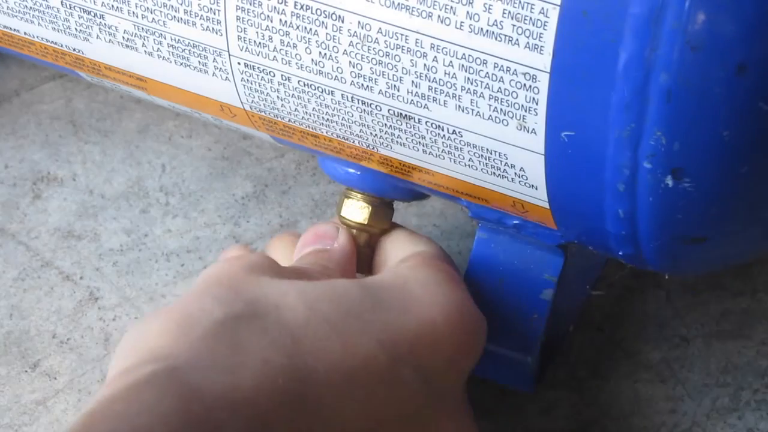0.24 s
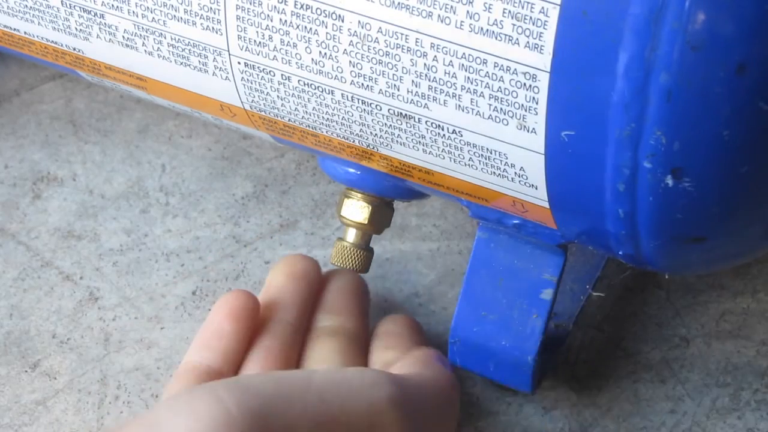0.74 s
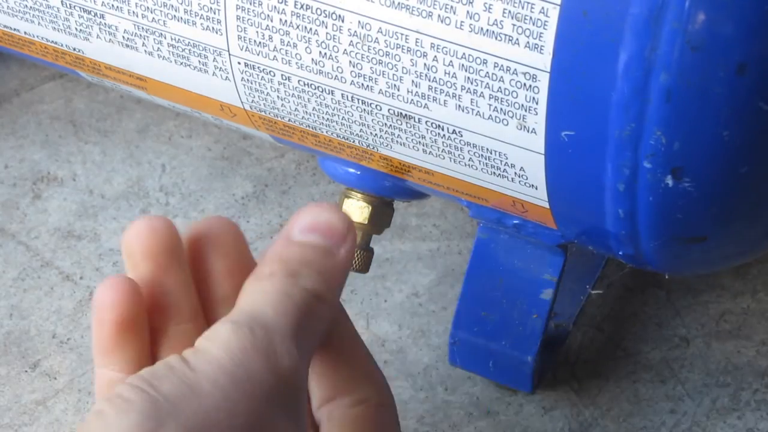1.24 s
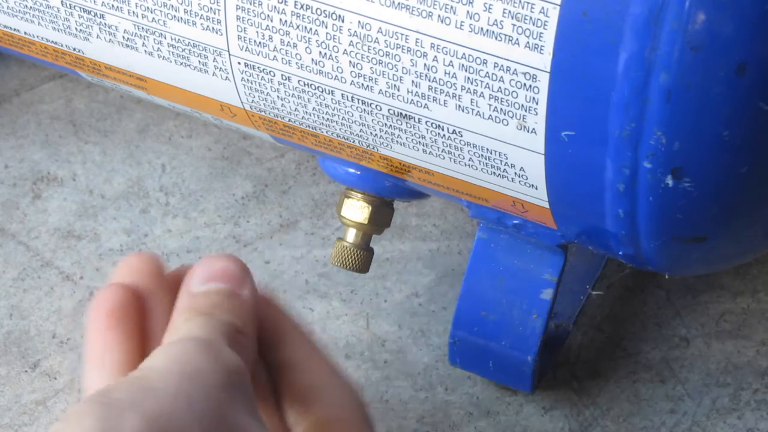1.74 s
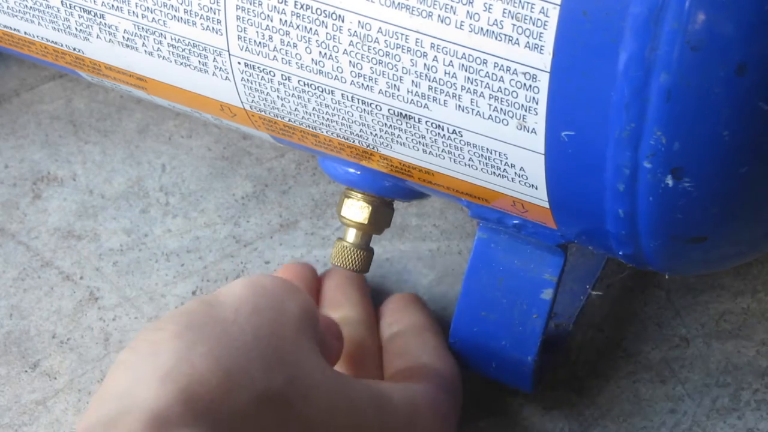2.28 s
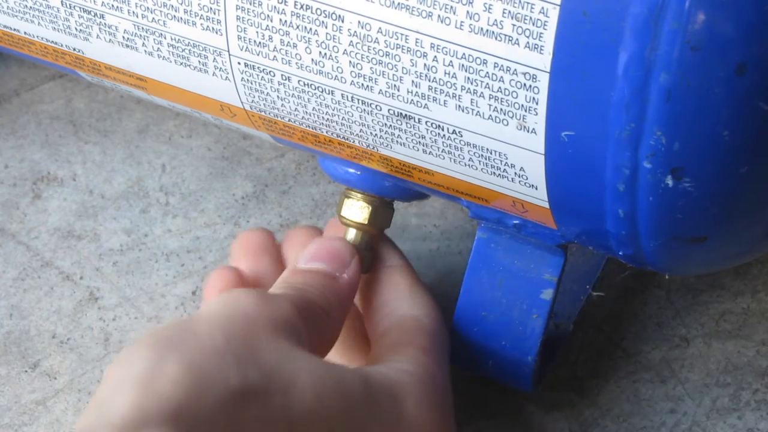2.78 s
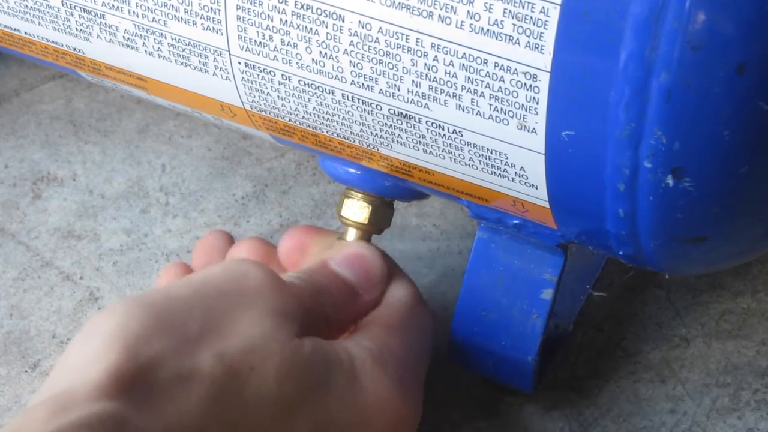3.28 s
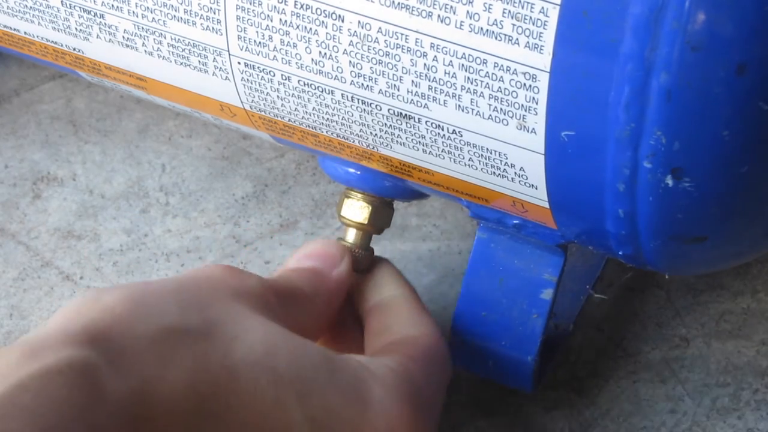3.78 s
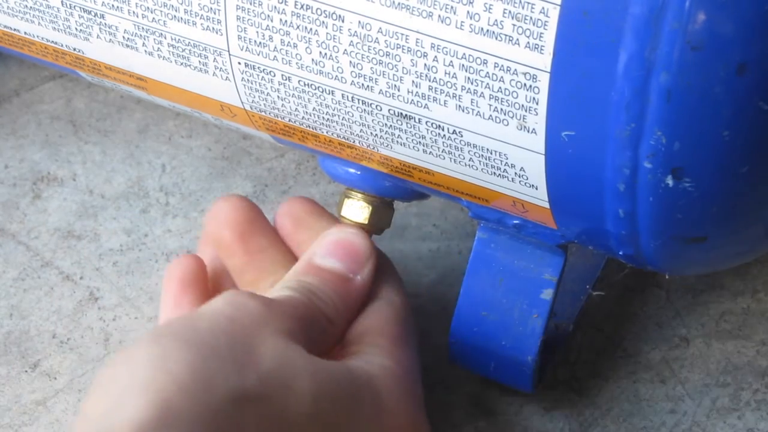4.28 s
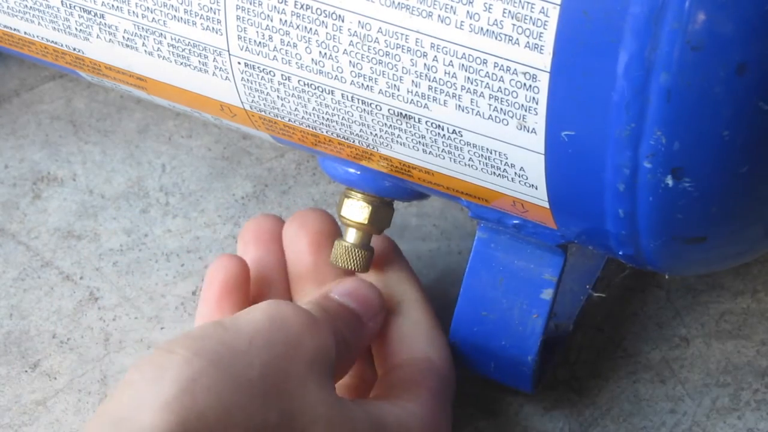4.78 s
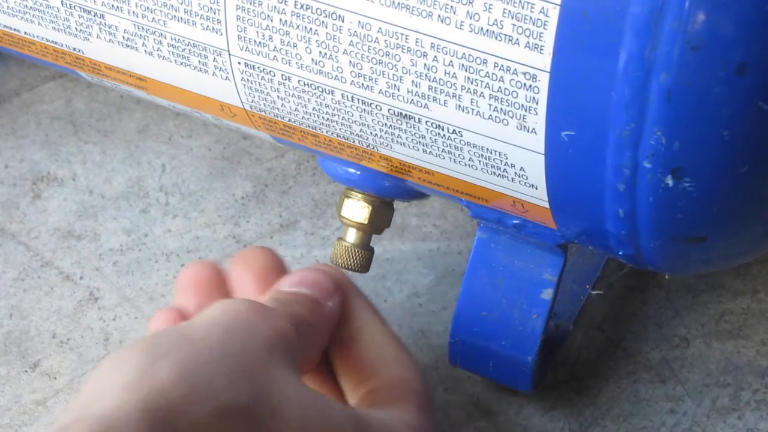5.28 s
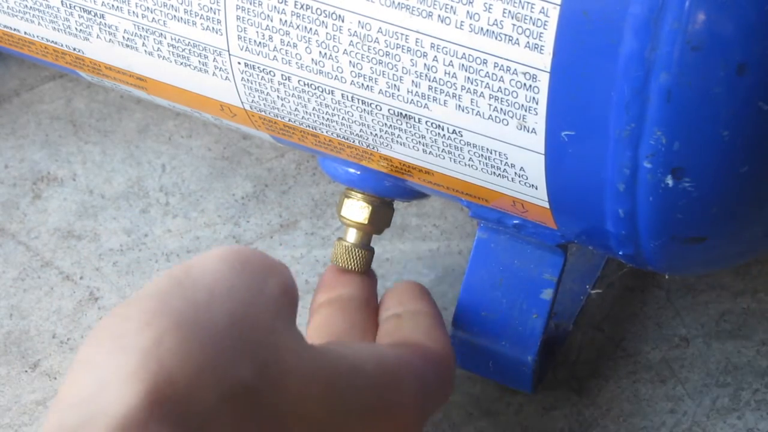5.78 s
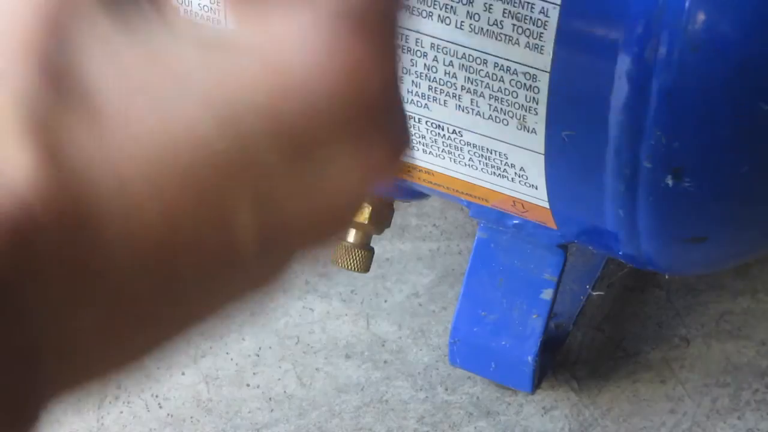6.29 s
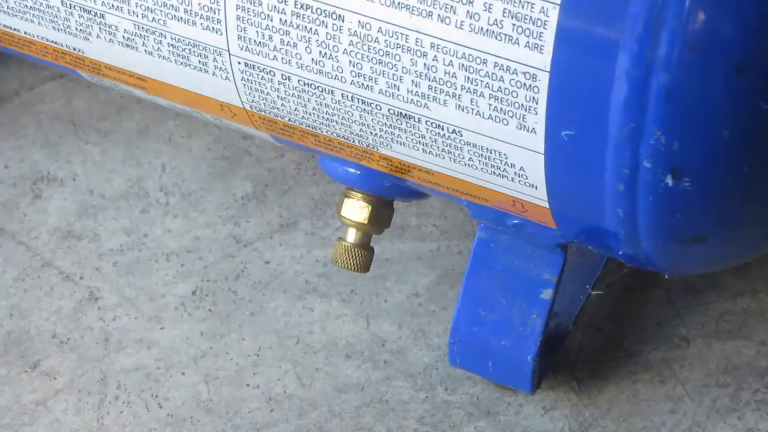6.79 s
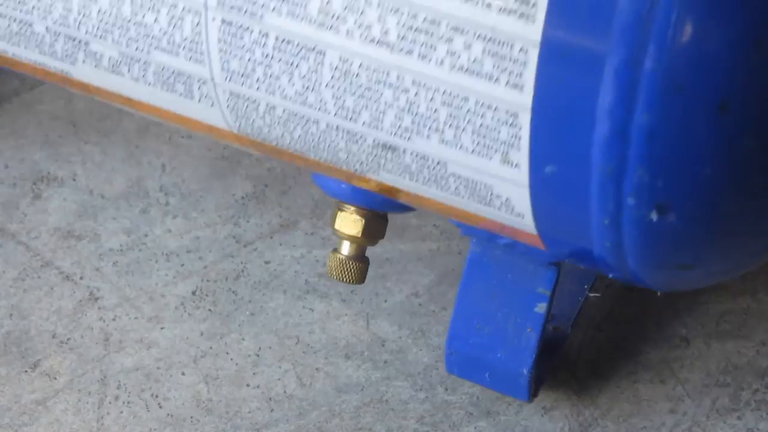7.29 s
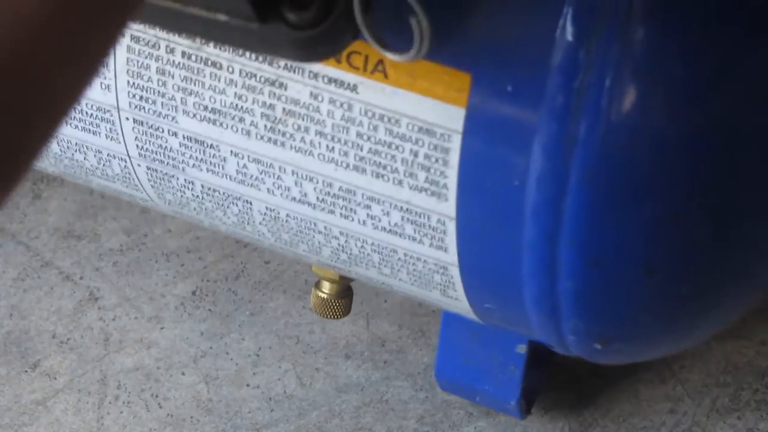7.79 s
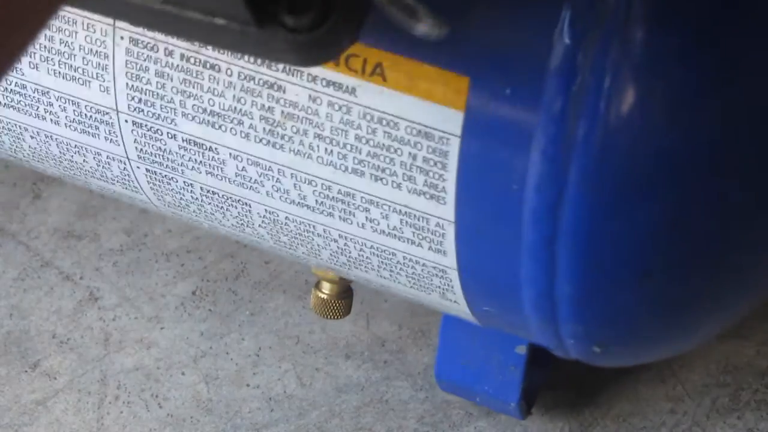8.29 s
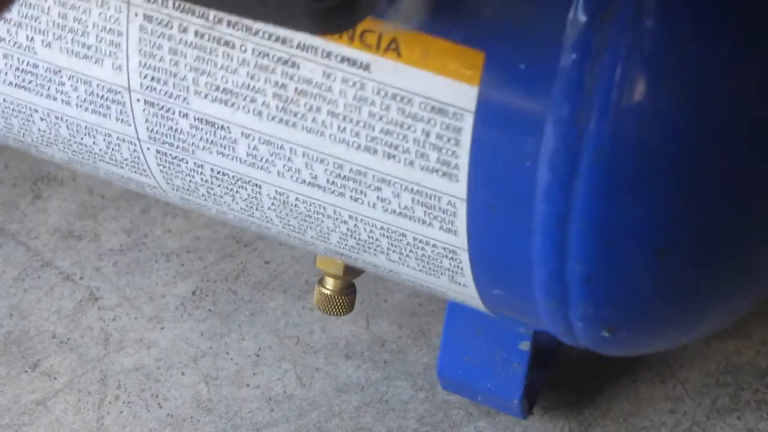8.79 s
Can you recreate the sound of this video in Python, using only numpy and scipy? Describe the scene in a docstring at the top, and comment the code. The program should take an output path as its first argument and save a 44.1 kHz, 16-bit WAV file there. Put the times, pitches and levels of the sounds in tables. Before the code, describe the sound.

Compressed air hisses harshly from a small tank's drain valve, sputtering and flaring under working fingers, then thins and fades with soft knocks.

```python
"""Drain valve hissing under a small compressor tank

Compressed air hisses over concrete while fingers work the valve's screw. The jet and its rush on the hand
are shaped noise; the bore adds four broad whistles, filtered from noise. Passing water makes the lowest
sputter, and a fingertip crossing the outlet flares the high one. Moving echoes off the hand comb the hiss.
Gusts hit the floor when the jet slips past the hand. Late on, a hand bumps the compressor and it rings."""
import sys
import numpy as np
from scipy import signal
from scipy.fft import rfft, irfft, next_fast_len
from scipy.io import wavfile
from scipy.ndimage import map_coordinates

SR = 44100
rng = np.random.default_rng(int(sys.argv[2]) if len(sys.argv) > 2 else 0)


def store_pcm(level_fs):
    """Save levels as 16-bit WAV."""
    pcm = np.round(np.clip(level_fs, -1, 1) * 32767).astype(np.int16)
    wavfile.write(sys.argv[1], SR, np.atleast_2d(pcm).T)


N = 399105
TIME = np.arange(N) / SR  # s

# Jet that misses the hand and reaches open floor. Each row: time in seconds, share 0-1.
CLEAR_OF_HAND = [(0, 0.08), (5.2, 0.08), (5.6, 0.2), (6.1, 0.26), (6.7, 0.37), (7.3, 0.47), (7.7, 0.96),
                 (9.05, 0.98)]


def gain_of(db):
    """Decibels to an amplitude factor."""
    return 10 ** (np.asarray(db) / 20)


def evened(x):
    """Scales a signal to rms 1."""
    return x / np.sqrt(np.mean(x ** 2) + 1e-20)


def follow(rows):
    """Draws straight lines through a table's times, giving each other column sample by sample."""
    seconds, *columns = np.transpose(rows)
    return [np.interp(TIME, seconds, column) for column in columns]


def add(mix, start_s, sound):
    """Mixes a sound in at its start time, cutting it at the end of the mix."""
    part = mix[round(start_s * SR):][:len(sound)]
    part += sound[:len(part)]


def noise(colour):
    """Turbulence as random noise of rms 1, its spectrum drawn through rows of Hz and relative dB."""
    hz, db = np.transpose(colour)
    size = next_fast_len(N)
    bin_hz = np.fft.rfftfreq(size, 1 / SR)
    shape = gain_of(np.interp(np.log(bin_hz + 1), np.log(hz), db))
    spectrum = rfft(rng.standard_normal(N), size)
    return evened(irfft(spectrum * shape, size)[:N])


def flutter(rate_hz):
    """Random wavering of rms 1, mostly slower than the given rate."""
    lowpass = signal.butter(2, rate_hz, fs=SR, output="sos")
    return evened(signal.sosfilt(lowpass, rng.standard_normal(N)))


def resonate(x, hz, width, order=1):
    """A resonance that follows hz; width in Hz is for one pass, and more passes steepen its skirts."""
    turn = np.exp(2j * np.pi * np.cumsum(hz * np.ones(len(x))) / SR)
    r = np.exp(-np.pi * width / SR)
    z = x / turn  # shift the centre down to 0 Hz
    for _ in range(order):
        z = signal.lfilter([1 - r], [1, -r], z)
    return evened((turn * z).real)


def whistle(hz, width):
    """Turbulence ringing one broad, steep-sided resonance."""
    return resonate(rng.standard_normal(N), hz, width, order=6)


def hump(length_s, edges):
    """A rise, hold and fall; edges is the share spent rising and falling."""
    return signal.windows.tukey(max(int(length_s * SR), 8), edges)


def bursts(rows, edges):
    """Amplitude of short bursts that rise, hold and fall."""
    level = np.zeros(N)
    for start_s, db, length_s in rows:
        add(level, start_s, gain_of(db) * hump(length_s, edges))
    return level


def delayed(x, delay_ms):
    """An echo whose path length may change, read between samples."""
    return map_coordinates(x, [np.arange(N) - delay_ms * SR / 1000], order=3)


def valve():
    """Jet, rush and whistles; water in the bore chops them together, the lowest whistle most."""
    # The free jet, as far as the screw lets it out. Each row: time in seconds, level in dB before trim.
    jet_level = [(0, -56), (.33, -50), (.47, -57), (1.2, -54), (2.3, -60), (3.02, -50), (3.15, -54.5),
                 (3.9, -44.5), (4.15, -45.5), (4.29, -40.5), (4.62, -49.5), (4.79, -43.5), (5.14, -54),
                 (6.05, -50.5), (6.55, -53.5), (7.5, -53), (8, -56), (8.35, -54.5), (9.05, -57)]
    # Colour of the jet. Each row: frequency in Hz, relative density in dB per Hz.
    jet_colour = [(1000, -15), (2800, -6), (3700, 0.5), (5000, -6), (6500, 7), (8100, 3.5), (10500, 2.5),
                  (12000, 1), (14000, -9), (15700, -21), (17000, -4.5)]
    # Rush, louder with fingers near the outlet. Each row: time in seconds, level in dB before trim.
    rush_level = [(0, -49.5), (.25, -36), (.41, -34), (.47, -40.5), (.72, -38), (1.36, -53), (2.04, -54),
                  (2.29, -43.5), (3.2, -43.5), (3.56, -40), (3.72, -39.5), (3.94, -45.5), (4.3, -36.5),
                  (4.55, -41.5), (5.01, -43), (5.26, -46.5), (5.33, -54.5), (5.6, -54.5), (5.71, -43),
                  (6.45, -53), (9.05, -57.5)]
    # Colour of the rush against the fingers. Each row: frequency in Hz, relative density in dB per Hz.
    rush_colour = [(300, -19), (1400, -19), (2000, -4), (2650, -2), (3200, 1.5), (3700, -1.5), (4150, 1),
                   (4750, 2.5), (5300, 2), (5800, 3.5), (7200, 0.5), (7900, -10), (9500, -11.5),
                   (16000, -10)]
    # Lowest whistle of the bore. Each row: time in seconds, level in dB before trim.
    low_level = [(0.0, -38), (0.05, -33.5), (0.53, -46), (0.78, -29), (0.85, -39.5), (1.31, -35),
                 (1.46, -43), (1.89, -38), (2.02, -44), (3.15, -36), (3.38, -39.5), (4.23, -37.5),
                 (4.28, -32), (5.09, -41.5), (5.32, -55), (5.69, -36.5), (6.05, -59), (6.1, -39),
                 (6.4, -47.5), (6.96, -36.5), (8.14, -52), (9.05, -51)]
    # It shifts as the screw rocks in its thread. Each row: time in seconds, pitch in Hz.
    low_pitch = [(0, 6500), (.7, 6230), (1.85, 6410), (2.25, 6480), (2.75, 6020), (3.15, 6160),
                 (3.48, 5620), (3.82, 6430), (3.98, 6140), (4.18, 6600), (4.35, 5940), (4.8, 6380),
                 (5.3, 6150), (5.52, 6650), (5.73, 6450), (5.87, 6000), (6.05, 6505), (9.05, 6600)]
    # Fingers close in and narrow the lowest whistle. Each row: time in seconds, share of power 0-1.
    focus_share = [(0, .05), (.6, 0.3), (.75, 0.46), (2.15, 0.5), (2.5, 0.28), (3.55, 0), (3.85, 0.3),
                   (4.4, 0.9), (5.05, 0.5), (5.9, 0.1), (9.05, 0.09)]
    # Middle whistle. Each row: time in seconds, level in dB before trim.
    middle_level = [(0.0, -39), (0.15, -35.5), (0.7, -42.5), (1.56, -43.5), (2.32, -47), (3.17, -42),
                    (3.3, -49.5), (3.78, -41.5), (4.31, -47), (4.51, -49), (4.79, -43.5), (5.47, -48),
                    (5.67, -38), (6.05, -47.5), (6.07, -36), (6.13, -34), (6.58, -40), (7.44, -40),
                    (8.77, -46), (9.05, -47)]
    # Upper whistles. Each row: time in seconds, high whistle in dB, top whistle in dB.
    treble_level = [(0, -37, -44), (.2, -43, -55), (.35, -35.5, -42), (.5, -42, -50), (.78, -43, -40),
                    (.88, -46, -56), (1.1, -42.5, -56), (2.1, -49.5, -49), (2.29, -48, -44),
                    (2.57, -52, -56), (3.05, -43, -51), (3.33, -40, -54), (3.42, -44, -46),
                    (4.11, -42.5, -55), (4.33, -38.5, -41), (4.6, -43, -47), (5.0, -43, -52),
                    (5.85, -49, -51), (6.1, -39.5, -41), (7.2, -44, -44), (7.65, -46, -54), (8.7, -45, -55),
                    (9.05, -50, -57)]
    # Fingertip crossing the outlet. Each row: start in seconds, level in dB, length in seconds.
    flare_rows = [(3.35, -36, 0.25), (3.59, -36, 0.14), (3.68, -33, .33), (4.11, -40, .1), (4.24, -37, .13),
                  (4.63, -37, 0.23), (5.52, -45, .1), (5.66, -43, .14), (6.03, -42, 0.26)]
    # Water in the valve. Each row: time in seconds, sputter depth in dB before each layer's share.
    water_depth = [(0, 1.5), (1, 3.2), (3.4, 1.7), (4.2, 1.2), (4.4, 4.5), (4.9, 0.5), (6.3, 3), (9.05, 0)]
    # Water clearing the bore. Each row: start in seconds, dB before each layer's share, length in seconds.
    spurt_rows = [(.63, -41, .2), (.819, -26, 0.0088), (.857, -31, .0064), (.898, -36, .019),
                  (.95, -39, 0.026), (1.08, -43.5, 0.22), (1.735, -40, 0.048), (1.806, -33, 0.0083),
                  (1.84, -40, 0.069), (3.01, -37, 0.092), (3.27, -40, 0.076), (3.635, -34.5, 0.051),
                  (4.262, -26, 0.0085), (4.29, -24, .004), (4.305, -30, .028), (4.381, -30, 0.0092),
                  (4.413, -20, .0037), (4.502, -31, 0.0066), (4.541, -25, 0.004), (4.823, -26.5, 0.0051),
                  (5.535, -39, 0.036), (5.67, -42, 0.14), (6.075, -44, .055), (6.6, -42, .11),
                  (7.3, -38, 0.012)]
    # The hand lets go of the screw. Each row: time in seconds, share of the trembling lost 0-1.
    hand_gone = [(6.0, 0), (6.4, 0.9)]
    # whistle centres with the screw at rest
    low_rest_hz, middle_rest_hz, high_hz, top_hz = 6406, 9410, 12480, 14500
    shift_share = 0.79  # the middle whistle follows this share of the lowest one's shift
    flare_hz, flare_width_hz, flare_wander_hz = 12420, 4800, 220  # the wander is rms at full trembling
    # fingers tremble on the screw: upper rate, then rms depths at full trembling
    tremble_hz, tremble_low_db, tremble_high_db, tremble_top_db = 7.2, 0.6, 0.7, 1.3

    jet_db, = follow(jet_level)
    rush_db, = follow(rush_level)
    low_db, = follow(low_level)
    middle_db, = follow(middle_level)
    high_db, top_db = follow(treble_level)
    low_hz, = follow(low_pitch)
    middle_hz = middle_rest_hz + shift_share * (low_hz - low_rest_hz)
    focus = np.clip(follow(focus_share)[0], 0, 1)
    depth_db, = follow(water_depth)
    chop = np.clip(evened(flutter(rate_hz=290) + 0.5 * flutter(rate_hz=28)), -1.7, 1.7)
    gush = bursts(spurt_rows, edges=0.35)
    tremble = flutter(tremble_hz) * (1 - follow(hand_gone)[0])

    def sputter(share):
        """Chopping that roughly keeps the mean power."""
        swing_db = share * depth_db
        return gain_of(swing_db * chop - swing_db ** 2 * np.log(10) / 20)

    jet = noise(jet_colour) * gain_of(jet_db + 7.5) * sputter(share=0.5)
    rush = noise(rush_colour) * (gain_of(rush_db + 2.5) * sputter(share=0.57) + 0.16 * gush)

    broad = whistle(low_hz, width=2650)
    core = whistle(low_hz, width=1500)
    low = np.sqrt(1 - focus) * broad + np.sqrt(focus) * core
    low_gain = gain_of(low_db - 3.0 + tremble_low_db * tremble)
    low = low * (low_gain * sputter(share=1.17) + 0.56 * gush)

    # the middle whistle has a shoulder on its upper side
    middle = whistle(middle_hz, width=1790) + 0.6 * whistle(middle_hz + 800, width=2800)
    middle = middle * gain_of(middle_db - 0.2)
    high = whistle(high_hz, width=4600) * gain_of(high_db + tremble_high_db * tremble)
    flare = whistle(flare_hz + flare_wander_hz * tremble, flare_width_hz)
    flare = flare * bursts(flare_rows, edges=0.35)
    top = whistle(top_hz, width=4200) * gain_of(top_db + tremble_top_db * tremble)
    upper = (middle + high + flare + top) * sputter(share=0.64)
    return jet + rush + low + upper


def plugs():
    """Amplitude share of the flow that passes while drops briefly lodge in the bore."""
    # Drops in the bore. Each row: start in seconds, level change in dB, length in seconds.
    plug_rows = [(.105, -6.5, .016), (0.828, -4, 0.033), (0.86, -4, 0.042), (0.923, 0, .02),
                 (1.042, -2.5, .026), (1.19, -7, 0.017), (1.785, -2, .02), (1.982, -4, .014),
                 (3.332, -4, 0.033), (3.6, -3.5, 0.027), (5.274, -4.5, 0.048), (6.015, -2, .034)]
    dip_db = np.zeros(N)
    for start_s, db, length_s in plug_rows:
        add(dip_db, start_s, db * hump(length_s, edges=0.2))
    return gain_of(dip_db)


def off_hand(x, scatter=0.095, wander_ms=0.11):
    """Inverted echoes from the hand's two rims and weaker ones from wrist and arm comb the hiss as they move."""
    # Rims of the cupped hand. Each row: time in seconds, far rim's delay in ms, base echo strength 0-1.
    hand_rows = [(0, 0.73, .08), (.45, 0.81, 0.16), (.7, 0.86, 0.3), (1.2, .81, 0.07), (2, 0.93, 0.07),
                 (2.2, 0.78, 0.18), (2.9, 0.76, 0.19), (3.5, .78, 0.05), (3.82, .8, 0.24), (4, .89, 0.13),
                 (4.18, .76, 0.1), (4.38, 0.89, 0.16), (5.15, .86, 0.25), (5.35, 0.96, 0),
                 (5.6, 1.03, 0.14), (5.85, 0.94, .19), (6.1, 0.99, .03), (9.05, 1.2, 0)]
    near_rim = 0.658  # path by the near rim over path by the far rim
    sway_per_s, sway_lost = 0.7, 0.74  # the arm's mean sway rate, and the share lost with the jet all clear

    far_ms, strength = follow(hand_rows)
    echoes = -strength * (delayed(x, near_rim * far_ms) + 1.3 * delayed(x, far_ms))
    clear = follow(CLEAR_OF_HAND)[0]
    travel = np.cumsum(sway_per_s * (1 - sway_lost * clear)) / SR
    for path_ms in np.geomspace(1.15, 4.2, num=8):
        pace, start, side = rng.random(3)
        sway = np.sin(2 * np.pi * ((0.5 + pace) * travel + start))
        echoes += scatter * np.sign(side - 0.5) * delayed(x, path_ms + wander_ms * sway)
    return (x + echoes) / np.sqrt(1 + 2 * strength ** 2 + 8 * scatter ** 2)


def floor_blow():
    """The spent jet spreads over the concrete, roars low and sounds the hollow gap under the tank."""
    # Blow on the floor, less over a cupped hand. Each row: time in seconds, level in dB before trim.
    blow_level = [(0, -52.5), (.8, -53), (2.7, -54.5), (4.3, -54.5), (4.9, -55.5), (6.1, -52.5),
                  (7.2, -52.5), (9.05, -54.5)]
    # Colour of the blow by the hand. Each row: frequency in Hz, relative density in dB per Hz.
    blow_colour = [(150, -27), (480, -14), (750, -1.5), (1000, 0.5), (1300, 0.5), (1650, -2.5),
                   (2400, -1.5), (2750, -7), (3200, -12.5), (3800, -22), (5500, -4), (8000, -34),
                   (16000, -35)]
    # Colour of the blow on open floor. Each row: frequency in Hz, relative density in dB per Hz.
    open_colour = [(150, -20), (600, -24), (900, -6), (1300, 2.5), (1750, 1.5), (2300, -6.5), (2750, -1),
                   (3300, -2), (3900, -15), (4600, -20), (8000, -19), (16000, -35)]
    # The jet slips past the hand. Each row: start in seconds, level in dB before trim, length in seconds.
    gust_rows = [(1.07, -54, 0.24), (5.51, -53, 0.096), (5.63, -50.5, 0.16), (6.06, -49, .4),
                 (7.37, -50.5, 0.16), (7.66, -52, 0.16)]
    # The jet reaches into the gap under the tank. Each row: time in seconds, level in dB before trim.
    hollow_level = [(0, -46.5), (.2, -46), (.4, -39.5), (.7, -50), (1.08, -49.5), (1.26, -43.5), (1.4, -47),
                    (2.1, -49), (2.45, -47.5), (3.5, -46.5), (3.9, -52), (4.3, -46.5), (5.3, -52),
                    (5.6, -44.5), (5.93, -57), (6.15, -47.5), (7.1, -50.5), (7.8, -46.5), (8.6, -49),
                    (9.05, -53)]
    # Narrow resonances of that gap. Each row: centre in Hz, width of one pass in Hz, relative level in dB.
    gap_modes = [(1542, 54, -1), (1677, 35, 3), (1960, 62, -4), (2028, 31, 1), (2197, 150, -4),
                 (2270, 120, -14), (2562, 18, 4.5), (2950, 100, -1)]
    # Low roar. Each row: time in seconds, level in dB.
    roar_level = [(0, -51.5), (1, -57.5), (3.3, -58), (4.3, -58.5), (5, -65), (5.6, -59.5), (7.2, -59.5),
                  (9.05, -58)]
    # Colour of the roar. Each row: frequency in Hz, relative density in dB per Hz.
    roar_colour = [(60, -7.5), (130, 4.5), (210, 5.5), (290, -5), (400, -2.5), (560, -2), (750, 0),
                   (1100, -13), (1600, -7), (4000, -43)]

    blow_db, = follow(blow_level)
    hollow_db, = follow(hollow_level)
    roar_db, = follow(roar_level)
    clear = np.clip(follow(CLEAR_OF_HAND)[0], 0, 1)
    blow = np.sqrt(1 - clear) * noise(blow_colour) + np.sqrt(clear) * noise(open_colour)
    strength = np.hypot(gain_of(blow_db), bursts(gust_rows, edges=0.17))  # powers add
    modes = evened(sum(gain_of(db) * resonate(rng.standard_normal(N), hz, width, order=2)
                       for hz, width, db in gap_modes))
    hollow = gain_of(-2.5) * whistle(hz=2158, width=1220) + gain_of(-6) * modes
    eddies = gain_of(1.04 * flutter(rate_hz=15.6))
    gusty = eddies * (gain_of(3) * blow * strength + hollow * gain_of(hollow_db + 0.2))
    return gusty + noise(roar_colour) * gain_of(roar_db)


def room(x, wet_db, t60):
    """Sparse reflections of random sign that die away by 60 dB in t60 seconds."""
    t = np.arange(SR // 2) / SR
    taps = rng.standard_normal(len(t)) * (rng.random(len(t)) < 0.1)
    taps = taps * (t > 0.002) * gain_of(-60 * t / t60)
    return gain_of(wet_db) * signal.fftconvolve(x, taps / np.linalg.norm(taps))[:N]


def background():
    """Low room noise, its booming resonances and a faint wavering hum."""
    # The room's own noise. Each row: frequency in Hz, relative density in dB per Hz.
    tone_colour = [(20, -34), (33, -25), (42, -20), (60, -8.5), (85, -4), (115, -2), (150, -2), (215, -7),
                   (320, -3), (480, -11.5), (900, -14), (3000, -28), (16000, -45)]
    # Low resonances of the room. Each row: centre in Hz, width of one pass in Hz, level in dB.
    boom_modes = [(111, 18, -70), (126.8, 23, -67.5), (214, 33, -65.5)]
    # Faint hum. Each row: time in seconds, level in dB.
    hum_level = [(0, -68), (1.6, -69), (1.9, -59), (2.4, -66), (2.9, -58.5), (3.4, -64), (4, -60.5),
                 (4.15, -71), (9.05, -77)]
    hum_hz = 406

    hum_db, = follow(hum_level)
    wavering_hz = hum_hz * (1 + 0.0075 * flutter(rate_hz=30.0))
    turn = 2 * np.pi * np.cumsum(wavering_hz) / SR
    hum = gain_of(hum_db) * evened(np.sin(turn) + 0.62 * np.sin(2 * turn))
    boom = sum(gain_of(db) * resonate(rng.standard_normal(N), hz, width, order=2)
               for hz, width, db in boom_modes)
    return gain_of(-58) * noise(tone_colour) + boom + hum


def bumps():
    """Soft blows of a hand ring the housing's decaying modes, with a short scuff of noise."""
    # Bumps on the compressor. Each row: start in seconds, level in dB.
    bump_rows = [(6.655, -45), (7.823, -39.5), (7.835, -40), (8.846, -42.5), (8.911, -54)]
    # What the housing rings with. Each row: frequency in Hz, relative level in dB, 60 dB decay in seconds.
    housing_modes = [(245, -0.5, 0.1), (300.4, -7, 0.096), (410, -6, 0.052), (537, -10, 0.078),
                     (740, -15, .06), (994, -3, 0.067), (1276, -6, 0.063), (1735, -2, 0.094),
                     (2190, -4, 0.31)]

    t = np.arange(SR // 2) / SR
    out = np.zeros(N)
    onset = 1 - np.exp(-t / 0.0023)
    for start_s, db in bump_rows:
        ring = sum(gain_of(mode_db - 60 * t / t60) * np.sin(2 * np.pi * (hz * t + rng.random()))
                   for hz, mode_db, t60 in housing_modes)
        scuff = resonate(rng.standard_normal(len(t)), hz=560, width=910, order=2)
        scuff = 0.66 * scuff * np.exp(-t / 0.02)
        add(out, start_s, gain_of(db) * (ring + scuff) * onset)
    return out


def scene():
    """The hiss with its moving reflections and a weak room tail, the same in both channels."""
    hiss = off_hand(valve() * plugs())
    air = hiss + floor_blow()
    knocks = bumps()
    nearby = room(hiss, wet_db=-16.5, t60=0.13)  # tank, legs and floor
    tail = room(air + knocks, wet_db=-8, t60=0.2)
    mono = gain_of(-0.43) * (air + nearby + tail) + knocks + background()
    return np.array([mono, mono])


def record(dry):
    """The recorder's band limit: a steep low-pass filter."""
    edge_hz = 15800
    lowpass = signal.firwin(701, edge_hz, window=("kaiser", 9), fs=SR)
    return signal.oaconvolve(dry, lowpass[None], "same")


dry = scene()
out = record(dry)
store_pcm(out)
```